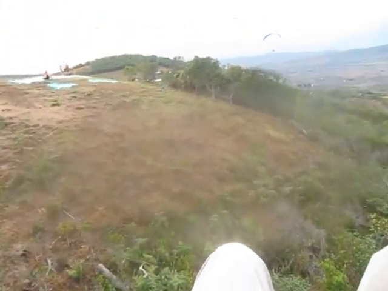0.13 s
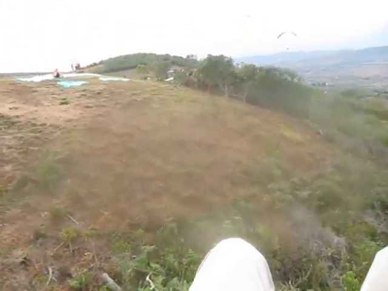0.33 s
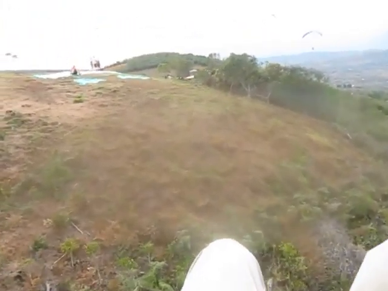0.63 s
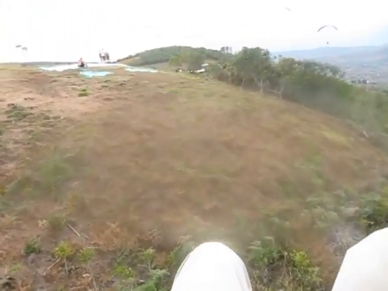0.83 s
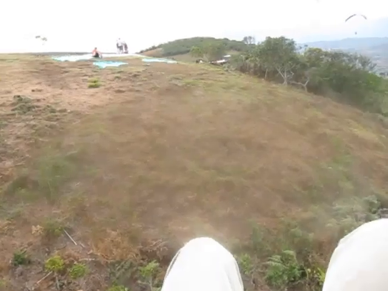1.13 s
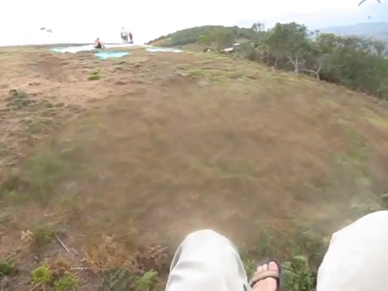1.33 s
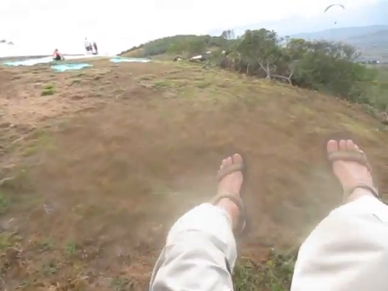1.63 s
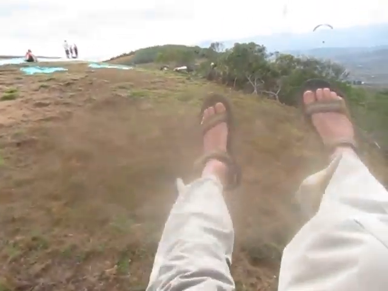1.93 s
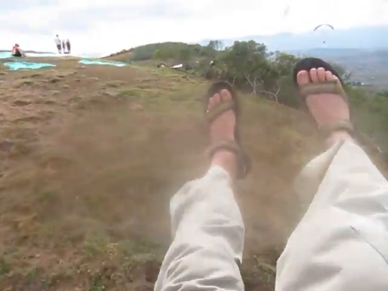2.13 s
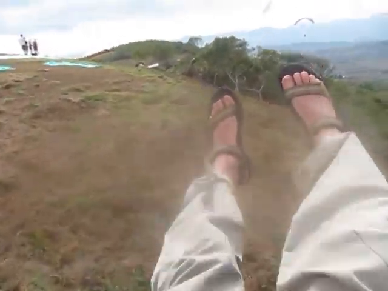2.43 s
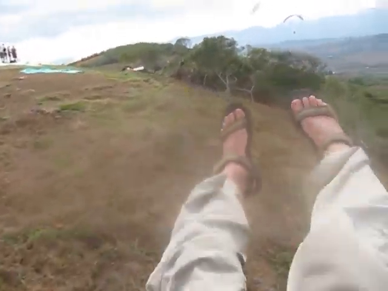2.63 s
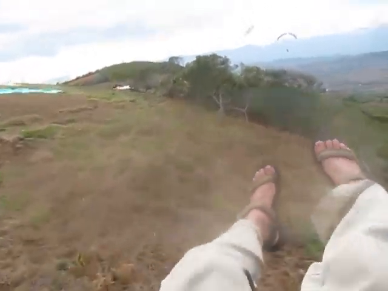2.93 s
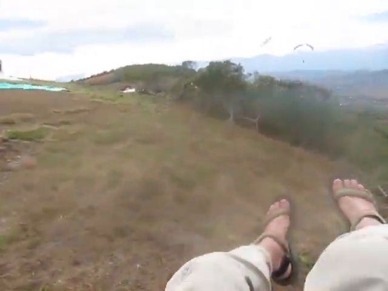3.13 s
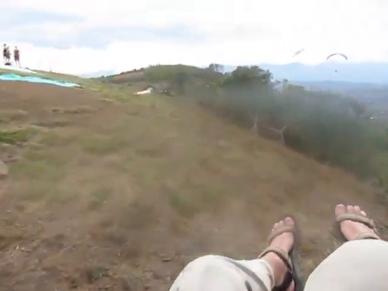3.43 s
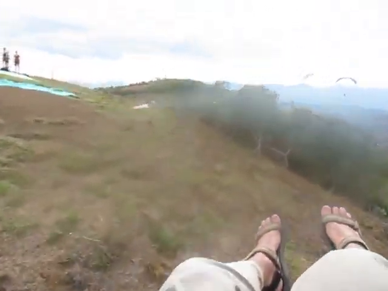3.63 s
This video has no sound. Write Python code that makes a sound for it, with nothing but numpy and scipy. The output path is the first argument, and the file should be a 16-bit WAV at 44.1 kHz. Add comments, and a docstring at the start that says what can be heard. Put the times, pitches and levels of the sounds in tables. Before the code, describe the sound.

Wind blows directly on a small camera microphone, a breathy mid-range rush over low, uneven rumble. A very faint dull ring comes at 0.4 s; the rush thins from 0.9 to 1.6 s. Soft low bumps land near 0.75, 1.6, 2.15 and, strongest, 2.5 s. A short buckle click sounds at 2.0 s, then gusts grow stronger and brighter. Small ticks follow at 3.6 s, over faint hiss.

```python
"""Wind buffets and rushes past a small camera hanging from a glider harness, low over a hillside.
Eddies: low coloured noise plus single pressure bumps; airflow: noise with casing resonances,
fluttering in overlapping bands. A buckle clicks once, with small ticks and a dull ring: decaying modes
and noise cracks. Beneath: the camera's noise hiss, narrow-band whines and a treble fizz once a second."""
import sys
import numpy as np
from scipy import signal
from scipy.fft import rfft, irfft
from scipy.io import wavfile
from scipy.ndimage import uniform_filter1d

SR = 44100
rng = np.random.default_rng(int(sys.argv[2]) if len(sys.argv) > 2 else 0)


def dump(signal):
    """Clip the signal to [-1, 1] and save it as 16-bit WAV at the path in sys.argv[1]."""
    limited = np.clip(np.atleast_2d(signal).T, -1, 1)
    pcm = np.round(limited * 32767).astype(np.int16)
    wavfile.write(sys.argv[1], SR, pcm)


def convert_level_to_amplitude(level_db):
    """Map a level in decibels to its linear amplitude factor."""
    exponent = np.asarray(level_db, float) / 20
    return 10 ** exponent


N = 166257

# camera hiss spectrum (frequency [Hz], relative density [dB])
HISS_SPECTRUM = [(1500, -7.5), (3000, -2), (5000, -3.5), (8000, -5.5), (10800, -8), (11500, -9.5),
                 (14000, -14), (17000, -20), (19000, -13)]
HISS_RMS_DB, HISS_FLICKER_DB, HISS_FLICKER_HZ = -61, 0.22, 12
# faint camera whines (frequency [Hz], width [Hz], rms level [dB])
WHINES = [(7484, 12, -86), (9729, 50, -81), (15734, 6, -92)]
FIZZ_START_S, FIZZ_EVERY_S, FIZZ_LENGTH_S = 0.05, 1.0, 0.11
FIZZ_HZ, FIZZ_WIDTH_HZ = 15400, 2600
FIZZ_DB, FIZZ_FLICKER_DB, FIZZ_FLICKER_HZ = -73, 2.0, 40  # FIZZ_DB: rms before gate and flicker

# buckle click (time [s], level [dB])
CLICK = [(1.9775, -27.5)]
# buckle modes (frequency [Hz], relative level [dB], t60 [s])
BUCKLE_MODES = [(1090, 3.5, 0.0094), (1351, -4, 0.015), (3350, -13.5, 0.019), (5030, -20, .015)]
# small harness ticks (time [s], level [dB])
TICKS = [(.39, -61), (3.6128, -42), (3.655, -51)]
# tick modes (frequency [Hz], relative level [dB], t60 [s])
TICK_MODES = [(7920, -4.5, 0.02), (11100, -14, .02)]
# short dull ring (time [s], frequency [Hz], level [dB], t60 [s])
RING = [(.385, 1005, -46, .15)]
# spectrum of the noise crack in each blow (frequency [Hz], relative density [dB])
CRACK_SPECTRUM = [(1500, -8), (3300, 11), (4500, -3), (7500, 0.5), (11000, -11), (14500, -15), (16000, -35)]
CRACK_T60_S = 0.013
CLICK_RISE_S, TICK_RISE_S, RING_RISE_S = 0.0018, 0.0012, 0.0046
CLICK_CRACK_DB, TICK_CRACK_DB, RING_CRACK_DB = -12, -3, -31  # re blow level

# airflow past the casing (time [s], level [dB])
AIRFLOW = [(0, -46), (0.2, -47), (0.4, -45), (0.55, -45.5), (0.7, -46.5), (0.82, -47), (0.9, -51.5),
           (1.0, -51), (1.15, -49.5), (1.3, -51), (1.45, -51), (1.6, -49.5), (1.75, -47.5), (1.9, -47.5),
           (2.03, -46.5), (2.1, -44), (2.16, -45.5), (2.27, -42.5), (2.38, -43), (2.47, -45), (2.6, -41.5),
           (2.7, -44.5), (2.8, -45.5), (2.95, -45), (3.08, -45.0), (3.18, -42.5), (3.3, -43.5),
           (3.45, -44.5), (3.6, -43), (3.77, -44)]
# airflow spectrum (frequency [Hz], relative density [dB])
RUSH_SPECTRUM = [(150, -16), (300, -2.5), (600, -1), (1200, -2.5), (1900, -3), (2600, -9), (3400, -13),
                 (4500, -21), (6000, -31.5), (9000, -36.5), (14000, -54)]
# casing resonances and notches (frequency [Hz], width [Hz], lift [dB])
CASING = [(850, 33, 2.5), (1400, 50, 3.5), (1665, 59, 2.5), (1867, 60, 2), (2075, 89, -3), (2366, 123, 5.5),
          (2770, 440, -3.5), (3113, 120, 4.5), (3674, 310, -8.5), (3760, 200, 1), (4270, 210, 3.5),
          (5070, 360, 2)]
FLUTTER_DB, FLUTTER_HZ = 0.58, 16  # all bands together
FLICKER_DB, FLICKER_HZ = 0.5, 20  # each band alone
BRIGHTEN_DB_PER_OCTAVE_DB = 0.36  # above 1 kHz, per dB of airflow re its mean
SETTLE_S = 0.14  # averaging time of the drift removed from random levels

# eddies on the capsule (time [s], level [dB])
BUFFET = [(0.0, -36), (0.21, -38), (0.42, -35), (0.63, -34), (0.84, -37.8), (1.05, -38), (1.26, -37),
          (1.47, -37), (1.68, -37.5), (1.89, -35), (2.1, -32), (2.31, -31), (2.52, -31.5), (2.73, -30.5),
          (2.94, -30), (3.15, -32.5), (3.36, -30), (3.57, -33.5)]
# eddy spectrum (frequency [Hz], relative density [dB])
EDDY_SPECTRUM = [(3, -19.5), (9, 2), (25, -1.5), (45, -1.5), (80, -10.5), (160, -16.5), (240, -19.5),
                 (320, -27.5), (700, -40)]
# single strong eddies bumping the capsule (time [s], peak level [dB], width [s])
BUMPS = [(0.549, -41.5, 0.0071), (0.748, -31, .005), (1.63, -26, .008), (2.148, -25, 0.0076),
         (2.49, -21, 0.0077)]


def coloured(points, lift_db=0):
    """Noise of rms 1 shaped by (frequency [Hz], density [dB]) points, interpolated over log frequency."""
    hz = np.fft.rfftfreq(N, 1 / SR) + 1
    point_hz, point_db = np.array(points, float).T
    shape_db = np.interp(np.log(hz), np.log(point_hz), point_db, -120, -120) + lift_db
    noise = irfft(rfft(rng.standard_normal(N)) * convert_level_to_amplitude(shape_db), N)
    return noise / np.sqrt(np.mean(noise ** 2))


def bell(hz, centre_hz, width_hz):
    """Gaussian over frequency, peak 1."""
    return np.exp(-2 * ((hz - centre_hz) / width_hz) ** 2)


def narrow_noise(centre_hz, width_hz):
    """Noise of rms 1 in a Gaussian band."""
    hz = np.fft.rfftfreq(N, 1 / SR)
    noise = irfft(rfft(rng.standard_normal(N)) * bell(hz, centre_hz, width_hz), N)
    return noise / noise.std()


def band(x, lo_hz, hi_hz):
    """Raised-cosine band on a log axis; half-overlapping neighbours sum to the whole."""
    place = np.log((np.fft.rfftfreq(N, 1 / SR) + 1) / lo_hz) / np.log(hi_hz / lo_hz)
    return irfft(rfft(x) * np.sin(np.pi * np.clip(place, 0, 1)) ** 2, N)


def walk(rate_hz):
    """Random levels held 1 / rate_hz, smoothed twice, slow drift removed; spread 1."""
    hold = int(SR / rate_hz)
    level = np.repeat(rng.standard_normal(400), hold)[:N]
    level = uniform_filter1d(uniform_filter1d(level, hold), hold)
    level = level - uniform_filter1d(level, int(SETTLE_S * SR))
    return level / level.std()


def curve(table):
    """Control curve at every sample."""
    return np.interp(np.arange(N) / SR, *np.array(table, float).T)


def strike(events, modes, rise_s, crack_db):
    """Each blow builds up over rise_s, rings decaying modes and carries a short noise crack."""
    out, crack = 0, coloured(CRACK_SPECTRUM)
    for at_s, db in events:
        t = np.maximum(np.arange(N) / SR - at_s, 0)
        rise = np.minimum(t / rise_s, 1) ** 2

        def envelope(t60_s):
            return rise * np.exp(-np.log(1000) * np.maximum(t - rise_s, 0) / t60_s)

        out = out + convert_level_to_amplitude(db + crack_db) * crack * envelope(CRACK_T60_S)
        for hz, mode_db, t60_s in modes:
            out = out + convert_level_to_amplitude(db + mode_db) * np.sin(2 * np.pi * hz * t) * envelope(t60_s)
    return out


def camera_hiss():
    """Broadband noise, level flickering slightly."""
    return coloured(HISS_SPECTRUM) * convert_level_to_amplitude(HISS_RMS_DB + HISS_FLICKER_DB * walk(HISS_FLICKER_HZ))


def camera_whines():
    """Narrow noise bands, heard as faint steady whines."""
    return sum(convert_level_to_amplitude(db) * narrow_noise(hz, width_hz) for hz, width_hz, db in WHINES)


def camera_fizz():
    """Treble noise band gated on once a second, flickering while on."""
    t = np.arange(N) / SR
    on = (t - FIZZ_START_S) % FIZZ_EVERY_S < FIZZ_LENGTH_S
    gate = uniform_filter1d(on.astype(float), size=300)  # soft edges
    flicker = convert_level_to_amplitude(FIZZ_FLICKER_DB * walk(FIZZ_FLICKER_HZ))
    return convert_level_to_amplitude(FIZZ_DB) * gate * flicker * narrow_noise(FIZZ_HZ, FIZZ_WIDTH_HZ)


def harness():
    """Struck modes: the buckle click, small ticks and one dull ring."""
    click = strike(CLICK, BUCKLE_MODES, CLICK_RISE_S, CLICK_CRACK_DB)
    ticks = strike(TICKS, TICK_MODES, TICK_RISE_S, TICK_CRACK_DB)
    ring = sum(strike([(at_s, db)], [(hz, 0, t60_s)], RING_RISE_S, RING_CRACK_DB)
               for at_s, hz, db, t60_s in RING)
    return click + ticks + ring


def rush():
    """Airflow noise coloured by the casing; bands flutter together and alone; gusts are brighter."""
    hz = np.fft.rfftfreq(N, 1 / SR)
    casing_db = sum(db * bell(hz, centre_hz, width_hz) for centre_hz, width_hz, db in CASING)
    air = coloured(RUSH_SPECTRUM, casing_db)
    flow_db = curve(AIRFLOW)
    gust_db = flow_db - flow_db.mean()
    flutter_db = FLUTTER_DB * walk(FLUTTER_HZ)
    out = 0
    for octave in np.arange(-3, 4.1, 0.5):  # re 1 kHz
        db = flutter_db + FLICKER_DB * walk(FLICKER_HZ)
        db = db + BRIGHTEN_DB_PER_OCTAVE_DB * max(octave, 0) * gust_db
        out = out + convert_level_to_amplitude(db) * band(air, 1000 * 2 ** (octave - 0.5), 1000 * 2 ** (octave + 0.5))
    return out * convert_level_to_amplitude(flow_db)


def buffeting():
    """Slow eddies press on the capsule; strong ones pull it once, with a smaller opposite swing each side."""
    out = coloured(EDDY_SPECTRUM) * convert_level_to_amplitude(curve(BUFFET))
    for at_s, db, width_s in BUMPS:
        u = ((np.arange(N) / SR - at_s) / width_s) ** 2
        out = out - convert_level_to_amplitude(db) * (1 - u) * np.exp(-u / 2)
    return out


def scene():
    """All layers at one capsule."""
    camera = camera_hiss() + camera_whines() + camera_fizz()
    return (camera + harness() + rush() + buffeting())[None]


def top_cut(x):
    """Nothing passes above the cut-off."""
    return signal.sosfilt(signal.butter(12, 17140, fs=SR, output="sos"), x)


def record(dry):
    """The finished mix as stored."""
    return top_cut(dry)


dry = scene()
out = record(dry)
dump(out)
```